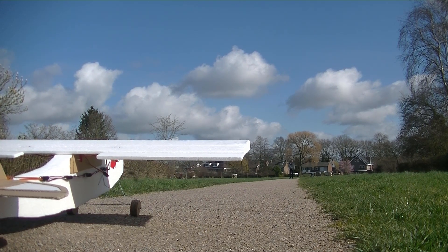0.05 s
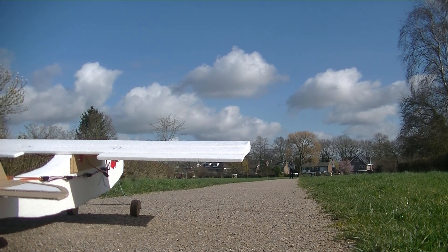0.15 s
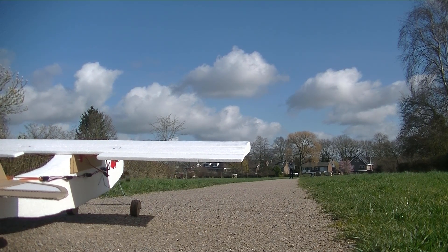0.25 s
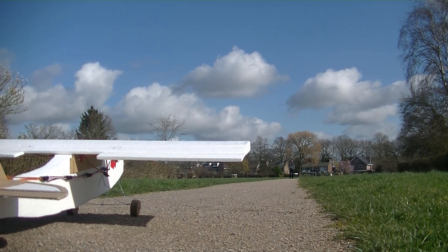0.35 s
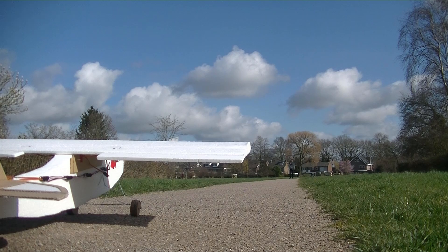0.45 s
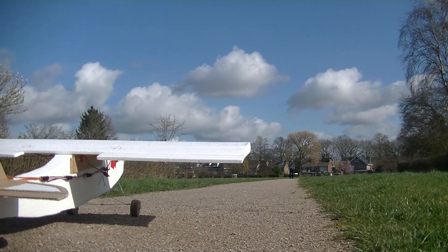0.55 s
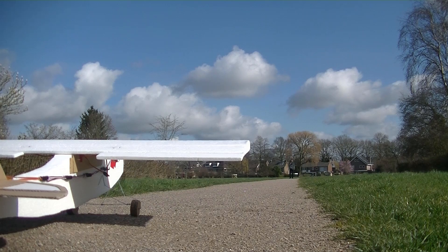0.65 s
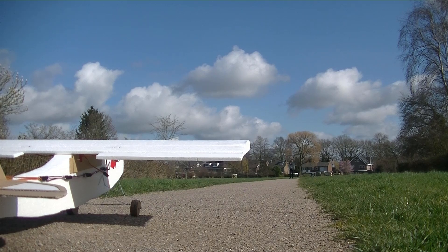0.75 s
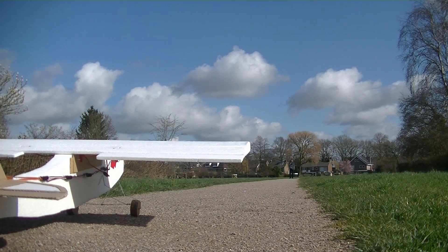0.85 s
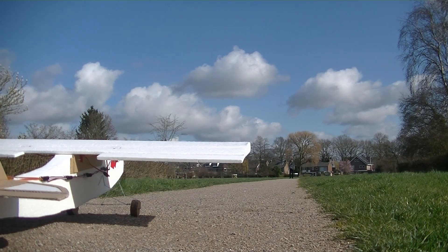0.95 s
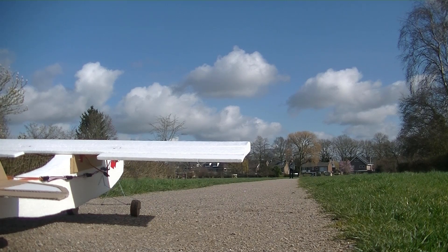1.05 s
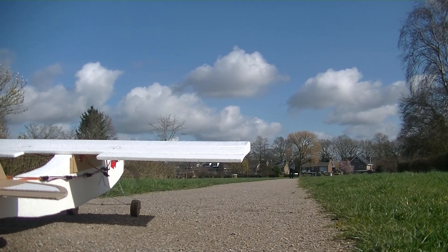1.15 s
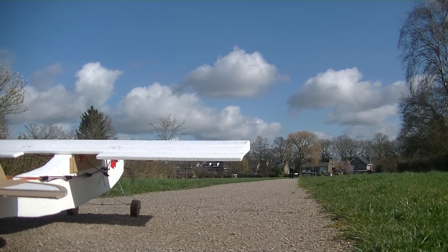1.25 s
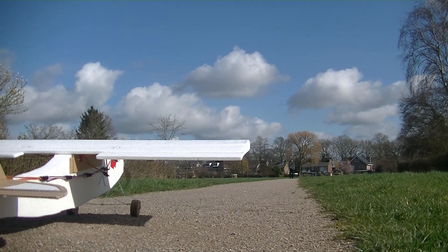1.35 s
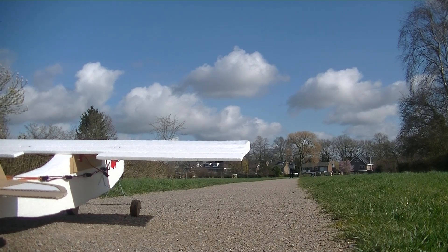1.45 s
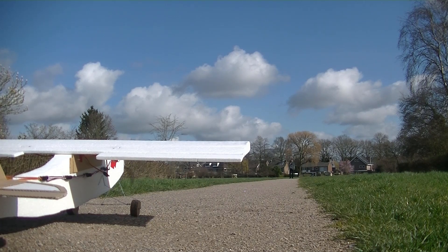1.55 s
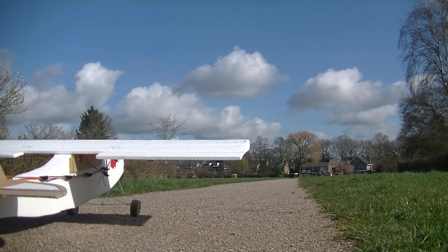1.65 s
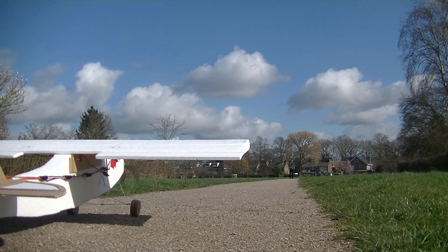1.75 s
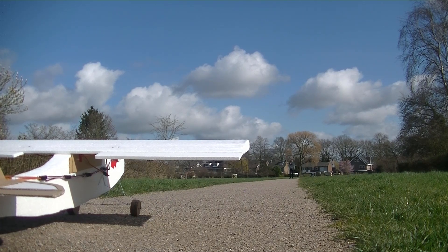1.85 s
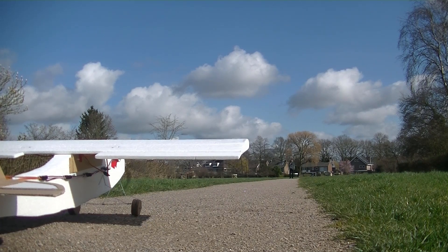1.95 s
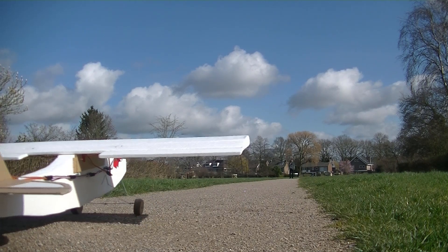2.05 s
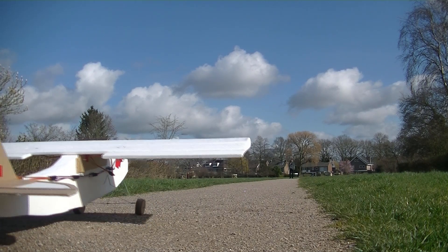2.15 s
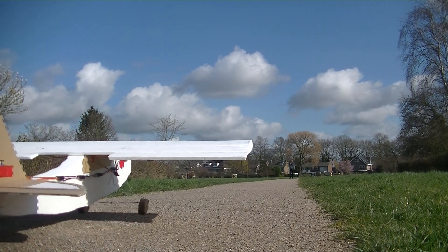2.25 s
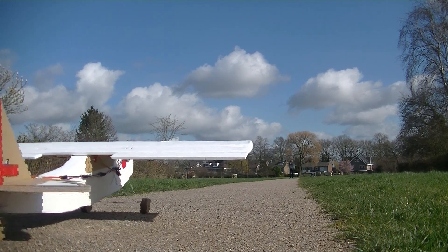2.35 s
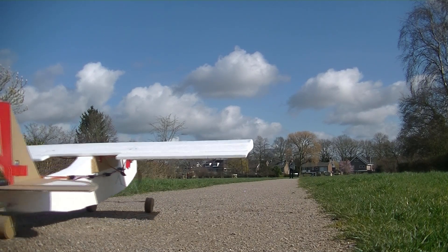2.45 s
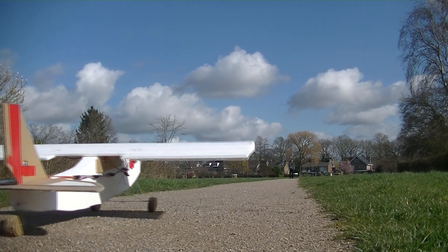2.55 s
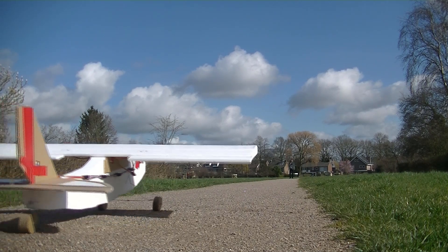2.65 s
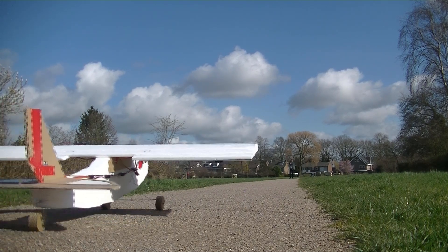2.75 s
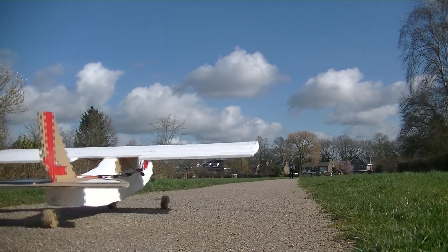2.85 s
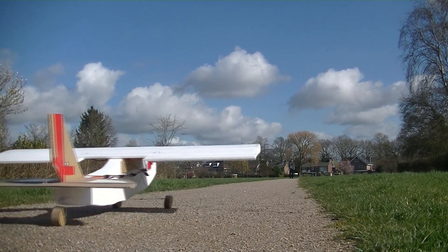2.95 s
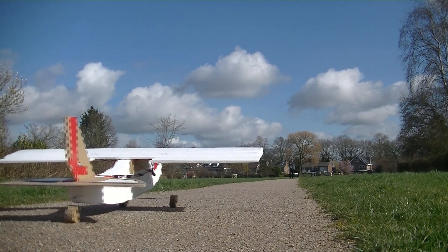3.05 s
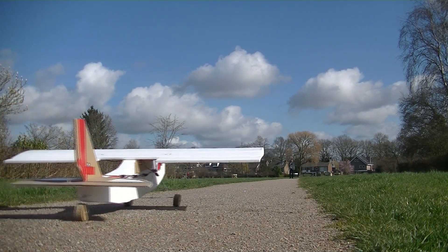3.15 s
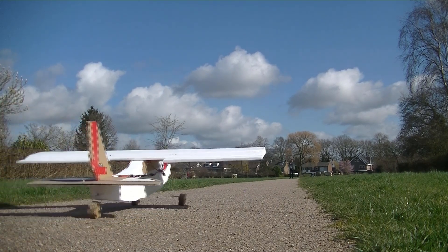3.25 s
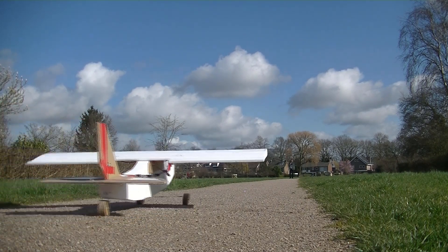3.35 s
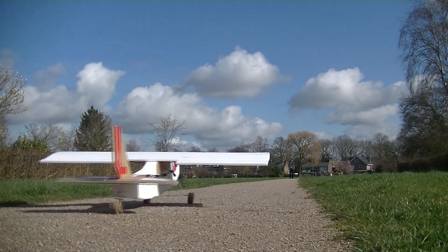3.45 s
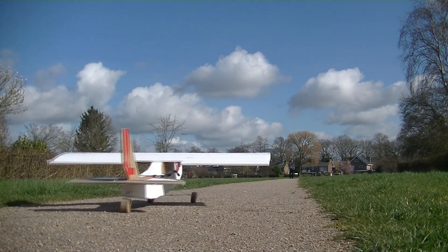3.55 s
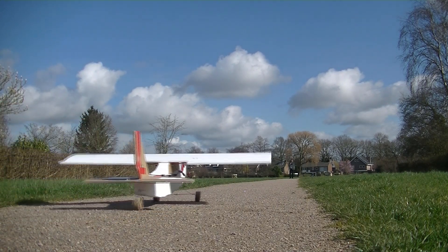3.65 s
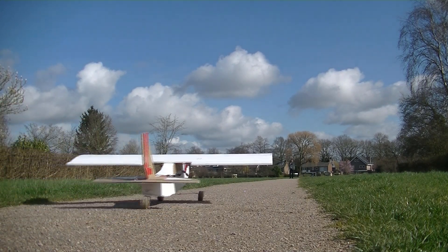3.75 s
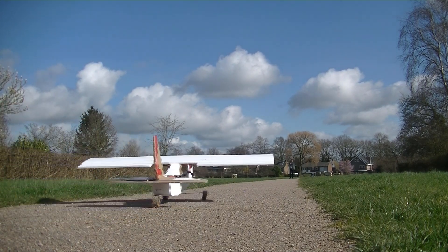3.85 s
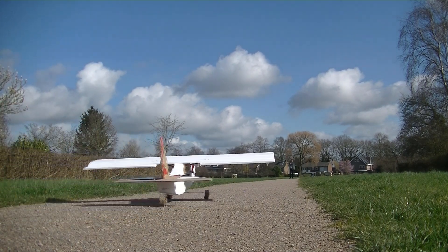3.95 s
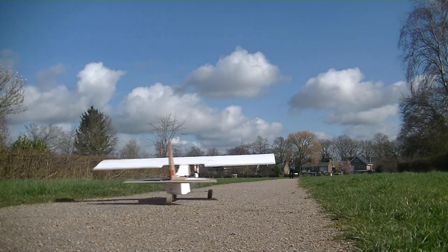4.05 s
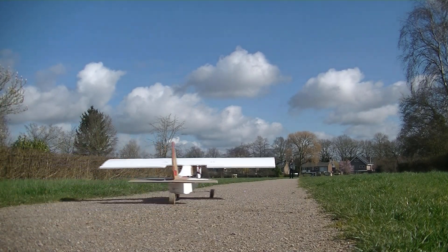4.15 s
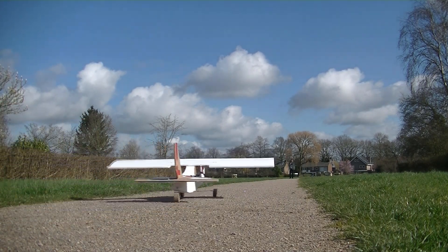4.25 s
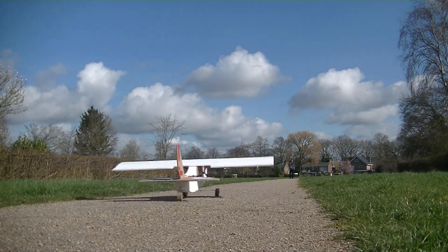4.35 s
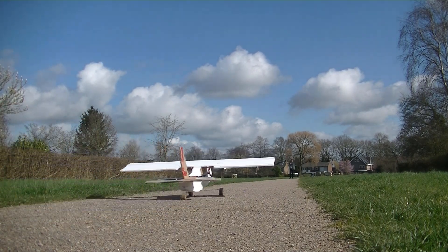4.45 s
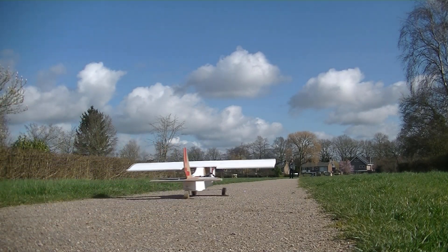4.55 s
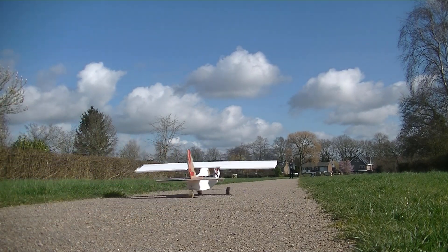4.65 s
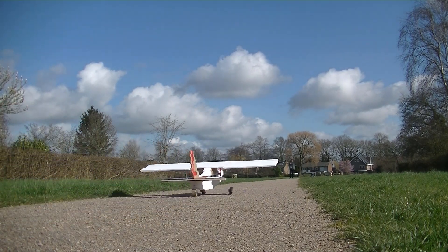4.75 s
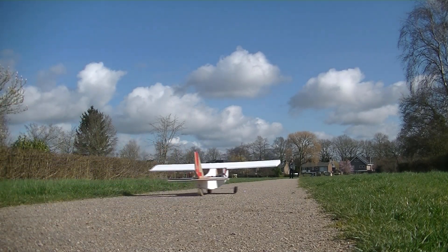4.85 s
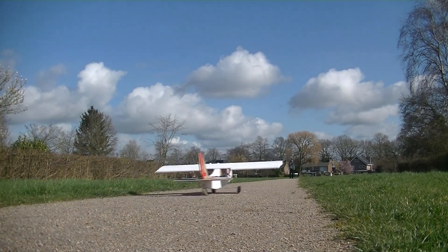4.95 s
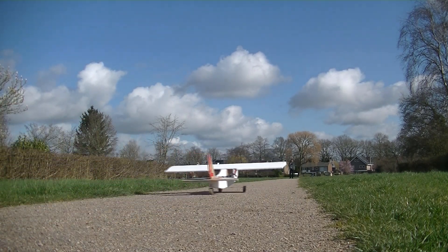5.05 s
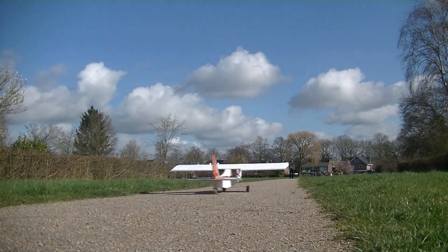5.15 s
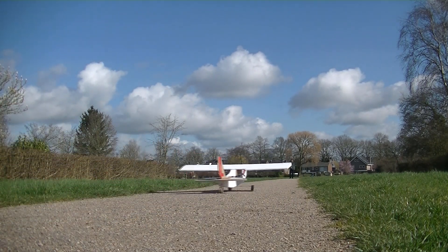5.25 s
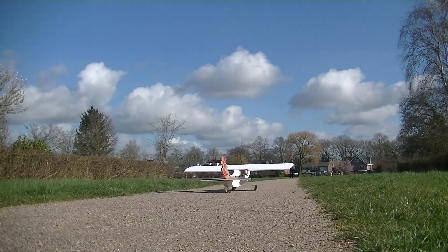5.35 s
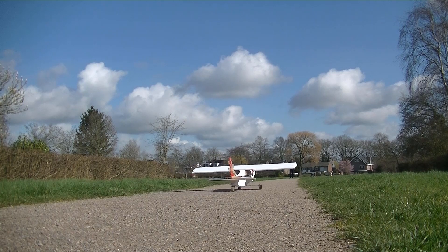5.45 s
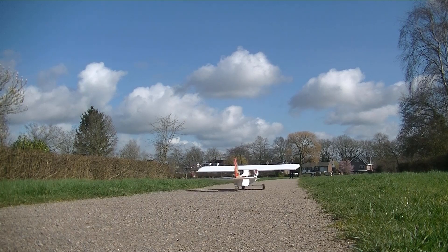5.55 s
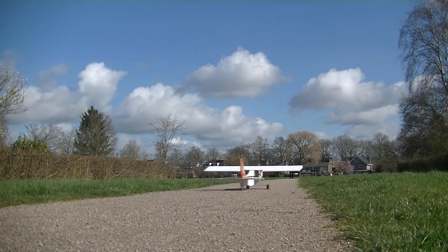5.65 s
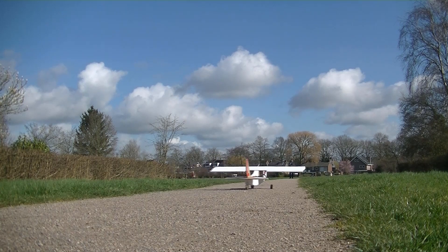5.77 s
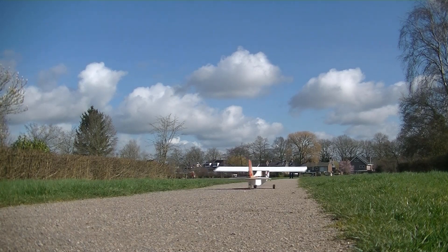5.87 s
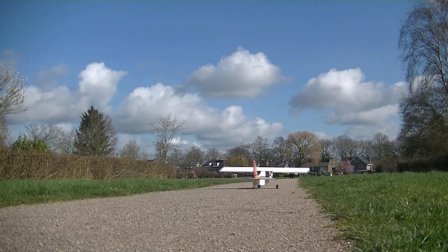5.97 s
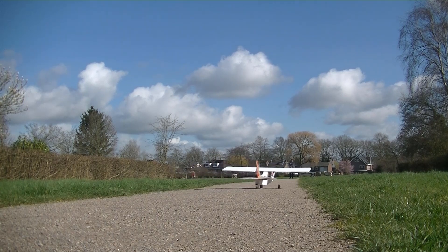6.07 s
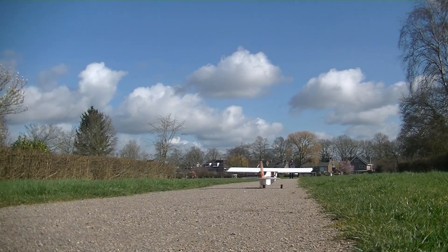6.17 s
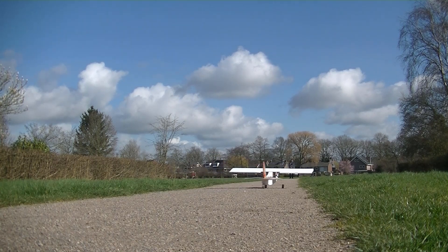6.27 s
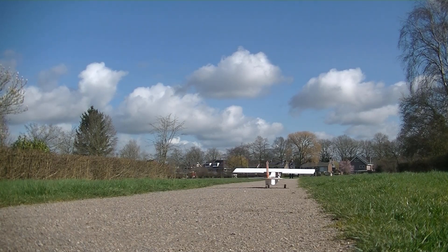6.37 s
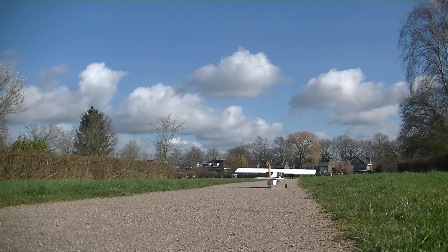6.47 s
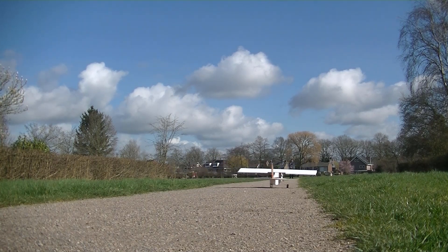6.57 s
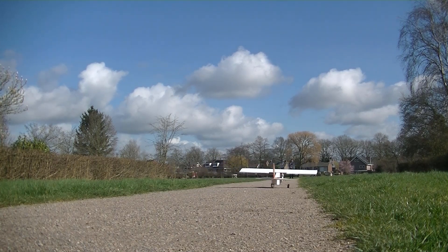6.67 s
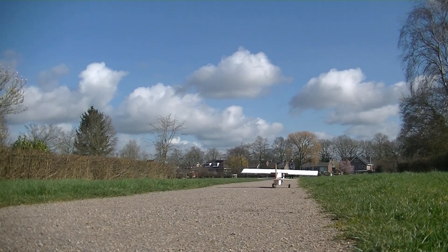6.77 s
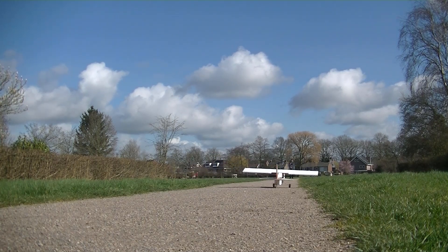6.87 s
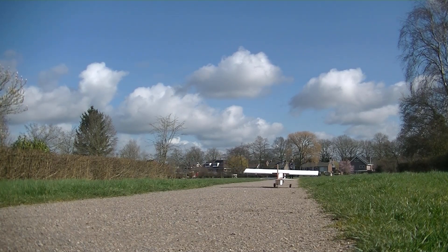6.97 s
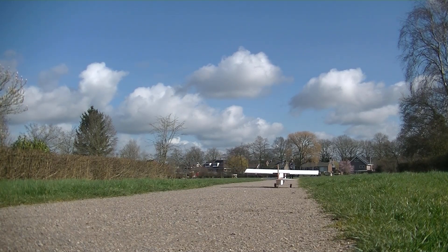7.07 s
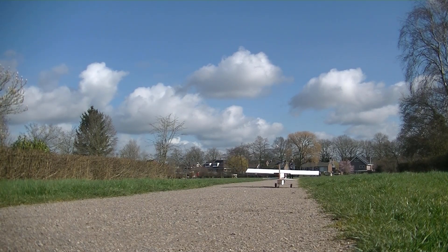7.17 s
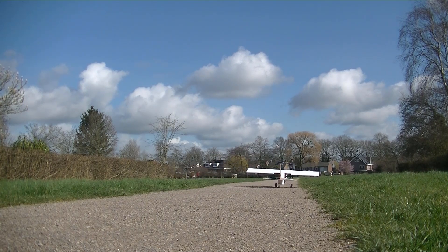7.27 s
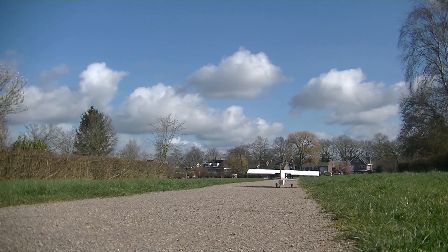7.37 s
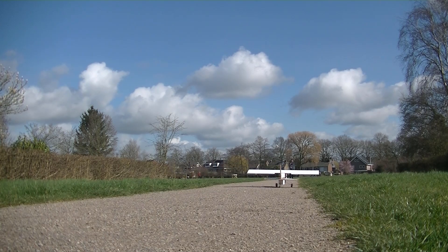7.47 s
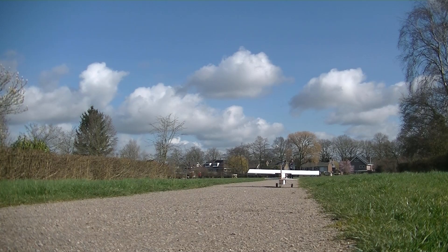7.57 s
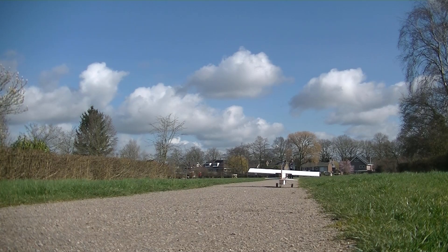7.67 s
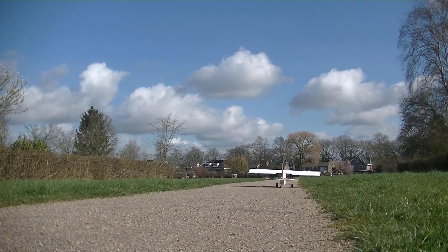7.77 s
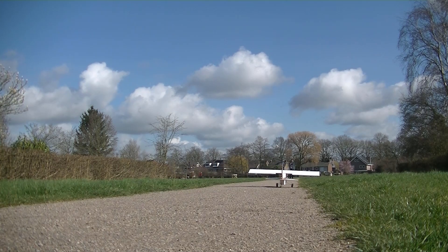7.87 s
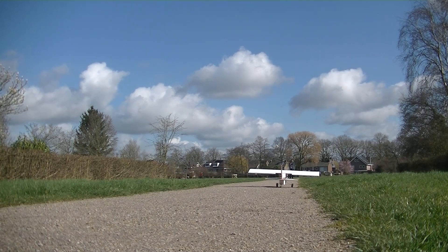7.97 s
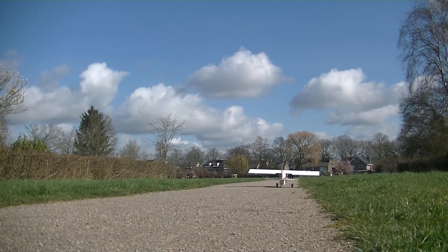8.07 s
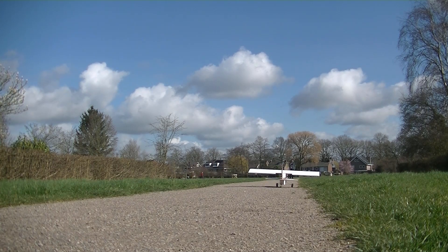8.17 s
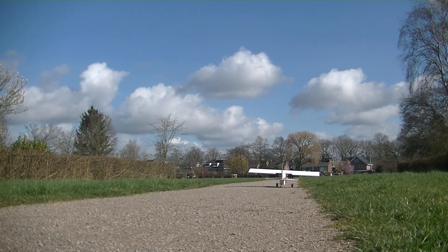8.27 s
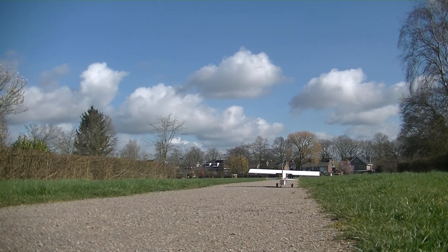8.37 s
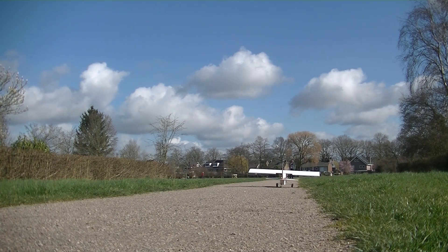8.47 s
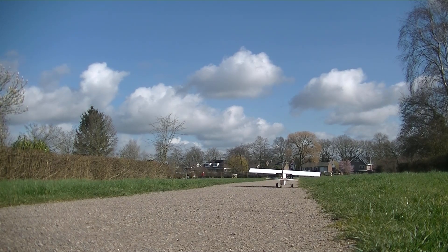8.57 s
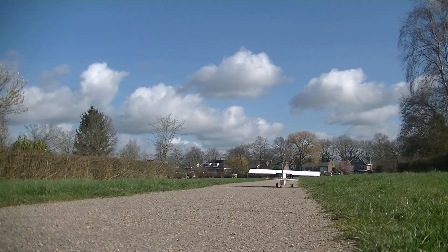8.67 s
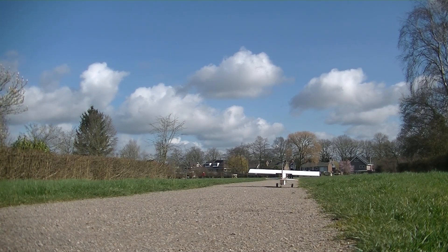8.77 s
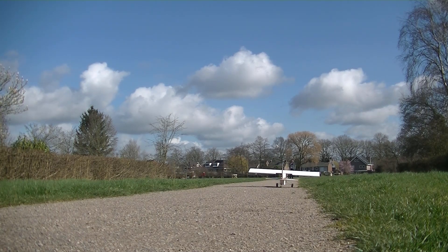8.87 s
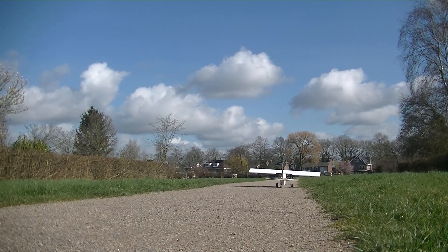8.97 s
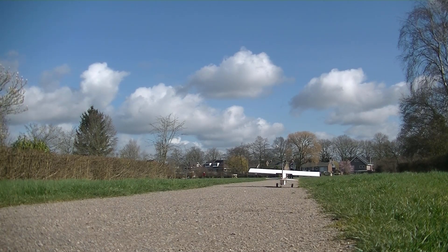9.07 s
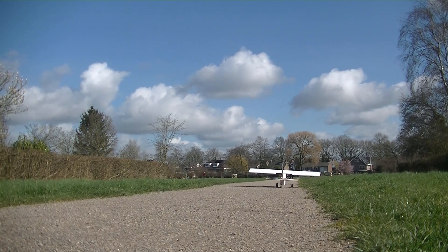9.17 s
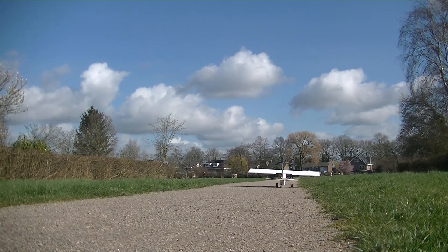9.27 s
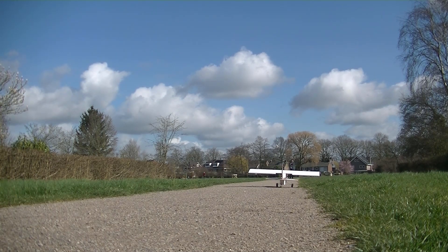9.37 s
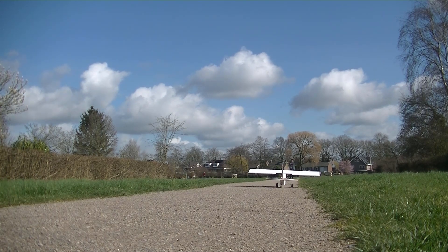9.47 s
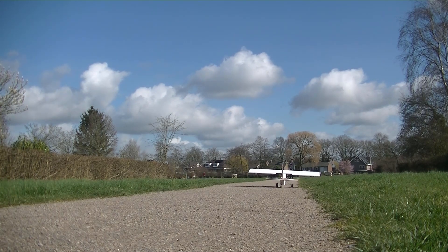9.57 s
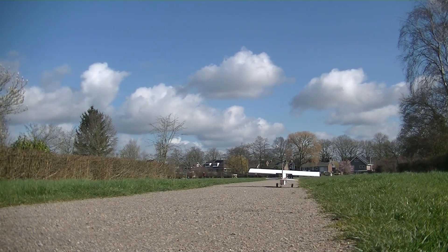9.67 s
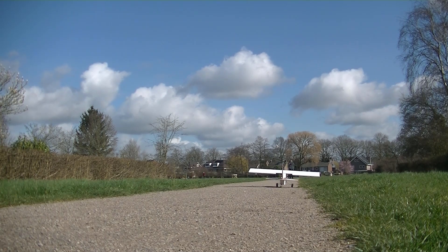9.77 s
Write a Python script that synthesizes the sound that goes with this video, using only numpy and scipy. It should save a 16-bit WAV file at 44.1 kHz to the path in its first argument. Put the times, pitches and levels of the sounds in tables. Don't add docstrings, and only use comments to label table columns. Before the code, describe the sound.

A small electric model plane's motor spools up with whine and airy wash, rattles away over gravel, then footsteps crunch nearby as a bird chirps.

```python
import sys
import numpy as np
from scipy import signal
from scipy.fft import rfft, irfft, next_fast_len
from scipy.io import wavfile
from scipy.ndimage import uniform_filter1d, map_coordinates

SR = 44100
rng = np.random.default_rng(int(sys.argv[2]) if len(sys.argv) > 2 else 0)


def volts_from_decibels(level):
    exponent = np.asarray(level, float) / 20
    return 10 ** exponent


def transcribe(signal):
    frames = np.atleast_2d(signal).T
    limited = np.clip(frames, -1, 1)
    pcm = np.round(limited * 32767).astype(np.int16)
    wavfile.write(sys.argv[1], SR, pcm)


N = 433052


def unit(x):
    return x / np.sqrt(np.mean(x ** 2) + 1e-20)


def along(points, hz):
    f, v = np.transpose(points)
    return np.interp(np.log(hz + 1), np.log(f + 1), v)


def curves(rows, outside=None):
    s, *cols = np.transpose(rows)
    t = np.arange(N) / SR
    return [np.interp(t, s, c, outside, outside) for c in cols]


def wobble(rate, order=3):
    knots = rng.standard_normal(int(N * rate / SR) + 4)
    return map_coordinates(knots, [np.arange(N) * rate / SR], order=order)


def filtered(x, response):
    m = next_fast_len(N + 8192)
    return irfft(rfft(x, m) * response(np.fft.rfftfreq(m, 1 / SR)), m)[..., :N]


def causal(spectrum):
    level_db = along(spectrum, np.fft.rfftfreq(2048, 1 / SR))
    cepstrum = irfft(np.log(volts_from_decibels(level_db) + 1e-4))
    cepstrum[1:1024] *= 2
    cepstrum[1025:] = 0
    h = irfft(np.exp(rfft(cepstrum)))[:1024]
    return h / np.linalg.norm(h)


def noise(spectrum, channels=1):
    white = rng.standard_normal((channels, N))
    return unit(filtered(white, lambda hz: volts_from_decibels(along(spectrum, hz))))


BANDS_HZ = (2900, 5200, 8800)


def four_bands(hz):
    edges = (0, *BANDS_HZ, SR)
    shares = np.array([(hz >= a) & (hz < b) for a, b in zip(edges, edges[1:])], float)
    return uniform_filter1d(shares, size=4000, axis=1)


def bursts(times, band_db, spectrum, t60, rise=0.00064):
    kicks = [np.bincount((times * SR).astype(int) % N, volts_from_decibels(db), N) for db in band_db.T]
    shape = signal.lfilter([1], [1, -volts_from_decibels(-60 / (t60 * SR))], kicks, axis=1)
    onset = np.exp(-1 / (rise * SR))
    shape = signal.lfilter([1 - onset], [1, -onset], shape, axis=1)
    impacts = filtered(shape * rng.standard_normal(N), four_bands).sum(0)
    return signal.fftconvolve(impacts, causal(spectrum))[:N]


def grit(rows, spectrum, count, spread_db, colour_db, clump_db, clump_rate, t60, bed_db):
    draw = rng.random((count, 2))
    sizes_db = -spread_db * np.log(0.03 + draw[:, 1:]) + colour_db * rng.standard_normal((count, 4))
    grains = unit(bursts(draw[:, 0] * N / SR, sizes_db, spectrum, t60))
    grains = grains + volts_from_decibels(bed_db) * noise(spectrum)[0]
    grains = unit(grains * volts_from_decibels(clump_db * wobble(clump_rate)))
    level_db, treble_db = curves(rows, outside=-120)
    treble = filtered(grains, lambda hz: hz > BANDS_HZ[1])
    return volts_from_decibels(level_db) * (grains + (volts_from_decibels(treble_db) - 1) * treble)


# (frequency [Hz], level [dB per Hz])
FIELD = [(18, -55), (30, -20), (103, -26), (279, -7.5), (1250, -13.5), (2340, -20.5), (3380, -6),
         (13900, -30.5), (15900, -41)]
FIELD_DB = -54
# (frequency [Hz], level [dB per Hz])
BUFFET = [(25, -45), (60, -15), (110, -3.5), (160, 3), (280, 1.5), (500, -10), (900, -35)]
# (time [s], level [dB])
GUSTS = [(0, -77), (.5, -65), (.7, -69), (.97, -58), (1.2, -81), (3.6, -75), (3.72, -49.5), (4.02, -49),
         (4.2, -65), (4.29, -53), (4.45, -66), (5.35, -71), (5.45, -50), (5.54, -56), (5.62, -53),
         (5.76, -58), (5.9, -74), (6.03, -54), (6.12, -75), (8.5, -77), (8.65, -71.5), (9.82, -73)]


def wind():
    gust_db, = curves(GUSTS)
    lumps = noise(BUFFET, channels=2) * volts_from_decibels(3.1 * np.array([wobble(20), wobble(16)]))
    hiss = noise(FIELD, channels=3)
    apart = filtered(hiss[:2], lambda hz: 1 / (1 + (hz / 4000) ** 2))
    shared = filtered(hiss[2], lambda hz: 1 / (1 + (3000 / (hz + 1)) ** 2))
    return volts_from_decibels(gust_db + 5.5) * unit(lumps) + volts_from_decibels(FIELD_DB) * (apart + shared)


# (time [s], pitch [Hz], level [dB])
NOTES = [
    [(7.765, 3000, -65), (7.772, 4000, -42), (7.79, 4450, -48), (7.805, 4200, -45), (7.815, 3700, -40),
     (7.825, 3300, -45), (7.84, 4300, -45), (7.845, 4300, -75)],
    [(7.843, 3240, -67), (7.855, 2840, -42), (7.875, 3000, -38), (7.89, 2560, -53), (7.9, 2500, -68)],
    [(7.9, 3900, -70), (7.91, 4150, -47), (7.935, 4520, -51), (7.95, 4250, -70)],
    [(8.06, 6400, -72), (8.09, 6250, -67), (8.125, 5500, -72)],
    [(8.2, 2800, -72), (8.225, 3050, -56), (8.25, 3900, -61), (8.29, 3870, -70)],
    [(8.615, 3330, -65), (8.64, 3800, -42), (8.655, 3350, -45), (8.668, 3100, -70)],
    [(8.785, 3000, -70), (8.795, 3900, -42), (8.805, 4450, -47), (8.82, 4200, -47), (8.83, 3770, -43),
     (8.842, 3290, -60), (8.852, 3480, -47), (8.862, 4330, -54), (8.875, 4400, -72)],
    [(8.875, 3300, -68), (8.885, 2880, -49), (8.915, 2770, -56), (8.96, 2800, -70)],
    [(8.9, 4370, -70), (8.92, 4200, -55), (8.94, 4000, -49), (8.95, 4100, -72)],
    [(9.27, 830, -70), (9.285, 816, -45), (9.31, 810, -72)],
]


def bird():
    song = np.zeros(N)
    for note in NOTES:
        hz, _ = curves(note)
        _, db = curves(note, outside=-140)
        phase = 2 * np.pi * np.cumsum(hz) / SR + .9 * wobble(300)
        song += volts_from_decibels(db + 3 * wobble(200)) * np.sin(phase)
    t = np.arange(SR // 4) / SR
    hedge = rng.standard_normal((2, len(t))) * volts_from_decibels(-60 * t / 0.35)
    echo = signal.fftconvolve(song[None], hedge / np.linalg.norm(hedge[0]), axes=1)[:, :N]
    return song * volts_from_decibels([[1.5], [-1.5]]) + volts_from_decibels(-2.5) * echo


# (frequency [Hz], level [dB per Hz])
GRAVEL = [(300, -33), (700, -19), (1250, -13.5), (1900, -3.5), (3200, -0.5), (4300, -4), (5100, -10.5),
          (5900, -3.5), (7000, -9.5), (8200, -12.5), (10500, -20.5), (15900, -23.5)]


def snaps(table):
    s, db, upper_db, top_db, lean_db = np.transpose(table)
    bands_db = np.transpose([lean_db, -lean_db, upper_db + 12.5, top_db + 23.5]) + db[:, None] - 1.5
    cracks = bursts(s, bands_db, GRAVEL, t60=0.0041, rise=0.00021)
    return filtered(cracks, lambda hz: hz ** 2 / (hz ** 2 + 900 ** 2))


# (time [s], level [dB], treble minus crunch [dB])
CRUNCH = [(6.6, -53, 1), (6.75, -47, -1.5), (6.95, -55, 4), (7.08, -45.5, 3.5), (7.2, -53, -2),
          (7.33, -57.5, 5), (7.45, -74, -3), (7.74, -58.5, -2), (7.8, -51, -2.5), (7.95, -55.5, 4),
          (8.02, -62, -1), (8.25, -61, 1), (8.33, -63.5, -1), (8.54, -67, 1), (8.63, -51, 4),
          (8.68, -55, 3), (8.73, -38.5, -4), (8.745, -68, 6), (8.97, -59.5, -0.5), (9.04, -48, 2),
          (9.12, -55.5, 4.5), (9.15, -40.5, 6), (9.18, -50.5, 6), (9.25, -36.5, 0), (9.3, -44.5, 4),
          (9.37, -59.5, 3), (9.45, -54.5, 0), (9.62, -46.5, 1), (9.72, -47.5, 6.5), (9.79, -38, 8.5),
          (9.82, -39, 5)]
# (time [s], peak [dB], upper band [dB], top band [dB], lean [dB])
SNAPS = [(7.6563, -27.5, -24, -31, -3), (7.7947, -20, -10, -22, 2.5), (7.8667, -31, -17, -25, -5),
         (7.9012, -22.5, -16, -30, 1), (8.0568, -35, 1, -13, -4), (8.2429, -33, -25, -26, -2),
         (8.4515, -22.5, -14, -24, -3.5), (8.4893, -20, -17, -31, -1), (8.576, -33, -22, -26, -5),
         (8.696, -31, -20, -30, 0), (8.7218, -21, -26, -29, 2), (9.0335, -32, -18, -28, -5),
         (9.06, -31, -15, -16, -4), (9.077, -30, -1, -8, -8), (9.1236, -29, -8, -15, -7),
         (9.1478, -24.5, 0, -11, 0), (9.208, -33, -15, -25, 0), (9.2265, -18, -12, -24, -2),
         (9.287, -20, -9.5, -19, -4), (9.3594, -25, -13, -29, 2), (9.4484, -27, -16, -35, 0),
         (9.4685, -18.5, -26, -36, 5), (9.5117, -15, -22, -49, 3.5), (9.566, -11.5, -16.5, -44, 7),
         (9.6125, -18, -8.5, -27, -1), (9.6963, -11, -19, -39, 2), (9.726, -29, -10, -18, 2),
         (9.7491, -19, -16, -24, 3), (9.7847, -17, -13, -25, -0.5)]
# (time [s], level [dB])
HEEL = [
    (8.722, -42),
    (8.73, -34),
]


def shoes():
    grind = grit(CRUNCH, GRAVEL, count=9000, spread_db=4, colour_db=4, clump_db=1.8, clump_rate=60,
                 t60=.005, bed_db=-5)
    s, db = np.transpose(HEEL)
    dull = [(120, -40), (300, -2), (900, 4), (1800, -4), (3500, -28)]
    thud = bursts(s, db[:, None] + np.zeros(4), dull, t60=0.014)
    return volts_from_decibels(3.5) * grind + snaps(SNAPS) + thud


# (time [s], peak [dB])
TICKS = [(2.4687, -28), (2.4967, -28), (2.5545, -29), (2.7466, -27), (2.9087, -28), (3.0459, -29),
         (3.0679, -25), (3.3482, -25.5), (3.5014, -25), (3.5408, -28), (3.5677, -30), (3.6091, -27),
         (3.7194, -33), (3.7468, -31), (3.7812, -29), (3.9079, -36), (4.2841, -32), (4.4367, -35),
         (4.4737, -31), (4.553, -26), (4.5769, -31), (4.7815, -36)]


def spray():
    s, db = np.transpose(TICKS)
    draw = rng.random((70, 2))
    s = np.append(s, 1.5 + 2.7 * draw[:, 0])
    db = np.append(db, -40 + 9 * draw[:, 1])
    bands_db = db[:, None] + [-40, -40, -14, 4.5]
    bright = [(300, -60), (9000, -9), (12000, -0.5), (15900, -0.5)]
    return bursts(s, bands_db, bright, t60=0.0069, rise=0.00015)


# (frequency [Hz], level [dB per Hz])
FOAM = [(180, -49), (300, -16), (603, -21), (992, -14), (1770, -13.5), (2240, -4.5), (3940, -1),
        (4570, -2.5), (5220, -22.5), (7050, -10.5), (8890, -25), (13700, -26.5), (15900, -36)]
# (time [s], level [dB], treble minus rattle [dB])
ROLL = [(2.1, -45, 8), (2.5, -34, 5), (3.2, -33.5, 0), (3.6, -27.5, -2), (4.05, -29.5, 0), (4.4, -27, 0),
        (4.8, -27.5, -2.5), (5.1, -29, -1.5), (5.45, -26, -3.5), (5.9, -30.5, -2.5), (6.3, -34.5, -1.5),
        (6.7, -37, -2), (7.1, -41.5, -6), (7.35, -46, -5), (7.7, -52.5, 0)]
# (time [s], peak [dB], upper band [dB])
STONES = [(2.3803, -20, -10), (2.5994, -11.5, -23), (2.692, -13, -17), (2.7794, -15, -8),
          (2.9625, -14, -22), (3.0748, -12, -17), (3.0934, -14, -8.5), (3.296, -17, -25),
          (3.348, -15.5, -11), (3.5026, -13.5, -14), (3.6095, -14.5, -11), (3.634, -14, -20),
          (3.6655, -17, -18), (3.695, -17, -20), (3.7088, -13, -18), (3.7813, -10, -16), (3.857, -11, -24),
          (3.8742, -12, -9.5), (3.936, -14, -19), (4.1194, -16, -18), (4.1323, -14.5, -23),
          (4.2223, -18, -20), (4.2843, -11.5, -17.5), (4.2989, -8, -25), (4.3718, -20, -21),
          (4.503, -20, -21), (4.554, -13, -18), (4.5773, -14.5, -17), (4.6362, -18, -21),
          (4.6563, -11.5, -18), (4.7642, -12, -25), (4.7943, -9.5, -19), (4.9485, -21, -20),
          (4.9612, -16, -26), (4.974, -7, -28), (4.9929, -14, -18), (5.0724, -12, -18), (5.156, -12, -22),
          (5.173, -14, -24), (5.2036, -14.5, -16), (5.3241, -9, -27), (5.437, -7.5, -27), (5.47, -20, -20),
          (5.5057, -22, -21), (5.5182, -9, -21), (5.598, -19, -9), (5.764, -14, -16), (5.855, -21, -24),
          (5.9234, -18, -25), (5.9362, -11, -26), (6.2134, -20, -23), (6.267, -16, -17), (6.5903, -27, -24),
          (6.824, -24, -20)]


def wheels():
    rattle = grit(ROLL, FOAM, count=7000, spread_db=4, colour_db=4.5, clump_db=2.6, clump_rate=30,
                  t60=.011, bed_db=-7)
    s, db, upper_db = np.transpose(STONES)
    lean_db = 3 * rng.standard_normal(len(s))
    bands_db = np.transpose([lean_db, -lean_db, upper_db + 16, upper_db + 9]) + db[:, None] - 4.5
    knocks = bursts(s, bands_db, FOAM, t60=0.02, rise=0.00063)
    return volts_from_decibels(-3) * rattle + filtered(knocks, lambda hz: hz ** 2 / (hz ** 2 + 1100 ** 2))


# (frequency [Hz], level [dB per Hz])
AIR = [(71, -50), (120, -28.5), (256, -22.5), (301, -36), (377, -18.5), (482, -18.5), (837, -13.5),
       (946, -9), (1450, -10), (3100, 0.5), (5060, -20), (6740, -7.5), (8610, -23.5), (10300, -20),
       (15900, -33)]
# (time [s], level [dB], treble level [dB])
WASH = [(0, -40.5, -48.5), (.5, -38.5, -46), (.8, -34, -41.5), (1.3, -32.5, -42), (1.6, -33, -39.5),
        (1.9, -32.5, -39), (2.4, -31.5, -42), (3, -33, -42), (4, -36, -48), (5, -33, -47), (6, -43.5, -56),
        (6.6, -55, -84)]


def wash(turn):
    level_db, treble_db = curves(WASH, outside=-120)
    puffs = 1 + 0.21 * np.cos(2 * turn)
    air = noise(AIR)[0] * puffs * volts_from_decibels(0.58 * wobble(30) + 1.87 * wobble(250))
    low = filtered(air, lambda hz: hz <= BANDS_HZ[1])
    ring = lambda hz: (hz > BANDS_HZ[1]) * (1 + .9 / (1 + ((hz - 6680) / 130) ** 2))
    treble = filtered(air, ring)
    return volts_from_decibels(level_db + 0.5) * unit(low) + volts_from_decibels(treble_db - 0.64) * unit(treble)


# (time [s], peak [dB], upper band [dB], top band [dB], lean [dB])
CATCH = [
    (0.0338, -18, -16, -16, 0),
]


def catch():
    return snaps(CATCH)


def tone(phase, db, flutter_db):
    level = volts_from_decibels(db + flutter_db * wobble(12, order=1))
    return level * np.sin(phase + .3 * wobble(25, order=1))


# (time [s], speed [Hz])
SHAFT = [(0, 38.19), (0.05, 39.26), (0.1, 40.99), (0.15, 42.88), (0.2, 44.35), (0.27, 46.02), (0.35, 47.39),
         (0.45, 48.39), (0.57, 49.62), (0.62, 51.15), (0.68, 53.84), (0.74, 56.11), (0.8, 57.86),
         (0.88, 59.48), (0.97, 60.66), (1.07, 61.69), (1.2, 62.56), (1.35, 62.93), (1.5, 63.41),
         (1.58, 63.6), (1.64, 65.23), (1.7, 67.06), (1.77, 68.44), (1.85, 69.44), (1.95, 70.05),
         (2.1, 69.44), (2.3, 69.12), (2.45, 69.23), (2.6, 70.71), (2.8, 71.5), (3, 71.54), (3.3, 72.51),
         (3.6, 73.27), (3.9, 72.99), (4.2, 72.98), (4.5, 72.95), (4.8, 72.52), (5.1, 70.69), (5.5, 69.66),
         (6, 69.17), (6.4, 67.09)]
# (time [s], blade loading [dB], magnet hum [dB])
POWER = [(0, -91, -59), (.3, -88, -52.5), (.6, -68, -55), (.8, -58, -53.5), (1.2, -60, -50),
         (1.5, -57, -52), (1.65, -51.5, -60), (1.9, -53.5, -49.5), (2.2, -54, -64), (2.5, -57.5, -53.5),
         (3, -58.5, -52.5), (3.5, -58, -54), (4.2, -65.5, -54), (5.3, -70, -67)]
# (time [s], level [dB])
COIL = [
    (0, -48),
    (.5, -46),
    (.65, -43),
    (1.6, -43),
    (4.4, -43),
    (4.9, -50),
    (5.4, -66),
    (6, -95),
]
# (shaft order, level [dB])
BLADES = [(4, -8), (6, -4), (8, -3), (10, -2), (12, 1), (16, 1), (18, -4), (20, -5), (22, -5)]
MAGNETS = [(11, -9), (12, -8), (13, -4), (14, 0), (15, -3), (28, -5), (42, 6)]
STEPS = [(84, 2), (105, 1), (126, 3), (147, -3), (168, 2)]
SWITCHING_HZ = 16058
# (shaft order, level [dB])
SIDEBANDS = [(6, -73), (14, -71), (42, -70), (56, -75)]
# (frequency [Hz], width [Hz], gain [dB])
FUSELAGE = [(860, 70, 6), (1065, 60, 8)]
# (frequency [Hz], gain [dB])
CAN = [(5000, -36), (5500, -19), (6100, -13), (6650, 0), (7100, -10), (7400, -22), (8000, -60)]


def motor():
    speed, = curves(SHAFT)
    speed = uniform_filter1d(speed, size=2000)
    turn = 2 * np.pi * np.cumsum(speed) / SR
    blade_db, magnet_db = curves(POWER, outside=-120)
    coil_db, = curves(COIL)

    def body_db(k):
        return sum(db / (1 + ((k * speed - hz) / width) ** 2) for hz, width, db in FUSELAGE)

    blades = sum(tone(k * turn, blade_db + db + 3.5, flutter_db=4.5) for k, db in BLADES)
    magnets = sum(tone(k * (turn + k), magnet_db + db - 3 + body_db(k), flutter_db=4.5) for k, db in MAGNETS)
    steps = sum(tone(k * turn, coil_db + db + 3 + along(CAN, k * speed), flutter_db=1.5) for k, db in STEPS)
    carrier = 2 * np.pi * SWITCHING_HZ * np.arange(N) / SR
    ripple_db = -4 * np.maximum(np.maximum.accumulate(speed) - 63.5, 0)
    beats = sum(tone(carrier - k * turn, ripple_db + db + 3, flutter_db=2) for k, db in SIDEBANDS)
    fold_db = ripple_db - 49 + along(CAN, SWITCHING_HZ - 147 * speed)
    fold = tone(carrier - 147 * turn, fold_db, flutter_db=2)
    return blades + magnets + steps + beats + fold, turn


# (frequency [Hz], level [dB])
SCATTER = [(150, -4), (600, -9), (1400, -9), (3000, -13), (6000, -19), (9000, -22), (15000, -23)]


def ports(x, balance, lead, scatter_db):
    side = np.array([[1], [-1]])
    t = np.arange(SR // 20) / SR
    tail = rng.standard_normal((2, len(t))) * volts_from_decibels(-60 * t / 0.041)
    wet = signal.fftconvolve(x[None], tail / np.linalg.norm(tail[0]), axes=1)[:, :N]
    both = x + filtered(wet, lambda hz: volts_from_decibels(along(SCATTER, hz) + scatter_db))
    return filtered(both, lambda hz: volts_from_decibels(side * along(balance, hz) / 2) * np.exp(.5j * side * along(lead, hz)))


# (frequency [Hz], left minus right [dB])
PLANE_DB = [(100, 4), (380, 8), (700, 6), (1300, 1), (2400, -2.5), (4400, .8), (8000, 0)]
SHOE_DB = [(300, 3), (900, 5), (2400, 4.5), (4400, 2.5), (8000, 0)]
# (frequency [Hz], left lead [rad])
PLANE_LEAD = [(260, 0), (950, -.8), (3800, .3), (5200, 0)]
SHOE_LEAD = [(300, -.5), (5000, -.4), (7000, 0)]


def scene():
    near = ports(shoes(), SHOE_DB, SHOE_LEAD, scatter_db=5)
    tones, turn = motor()
    plane = spray() + wheels() + wash(turn) + catch() + tones
    return wind() + bird() + near + ports(plane, PLANE_DB, PLANE_LEAD, scatter_db=-.5)


def top_cut(x):
    return signal.sosfilt(signal.butter(12, 16540, fs=SR, output="sos"), x)


def record(dry):
    mix = filtered(dry, lambda hz: hz < 15900)
    return top_cut(mix)


dry = scene()
out = record(dry)
transcribe(out)
```